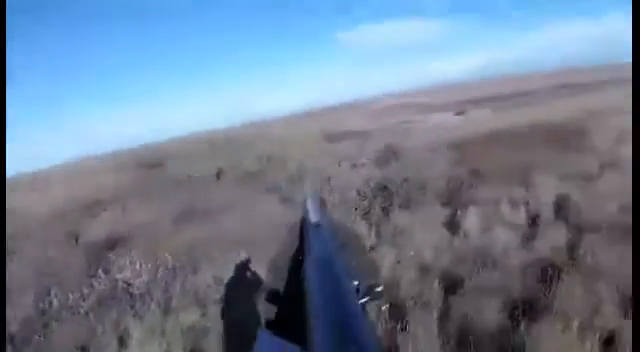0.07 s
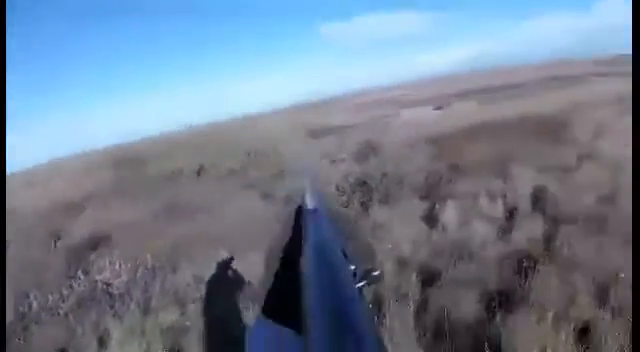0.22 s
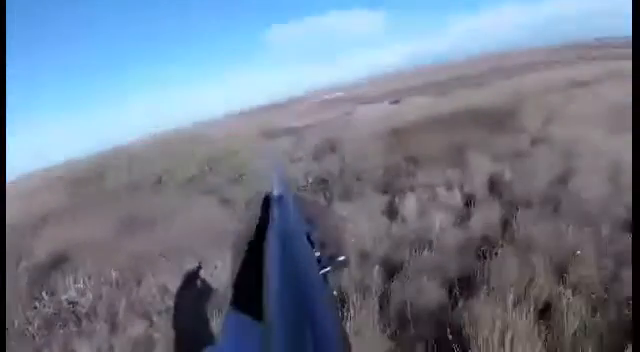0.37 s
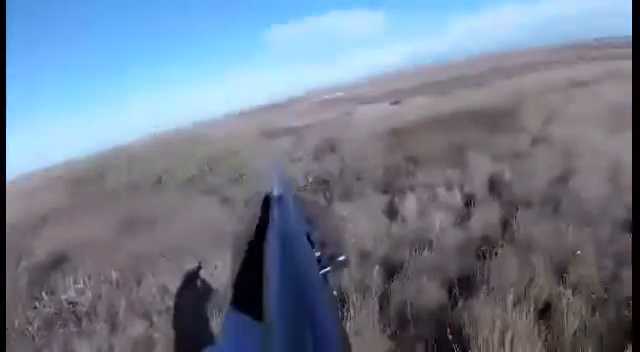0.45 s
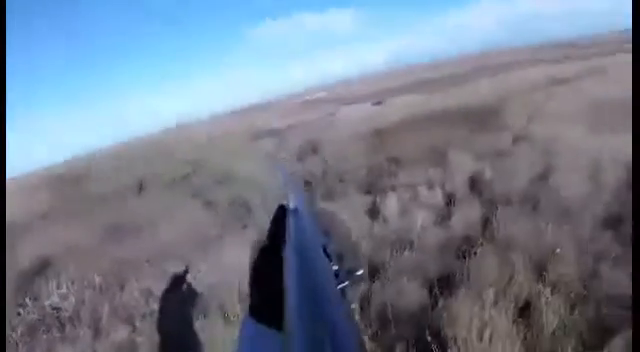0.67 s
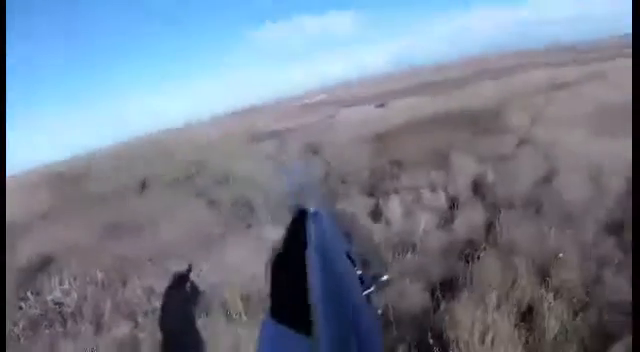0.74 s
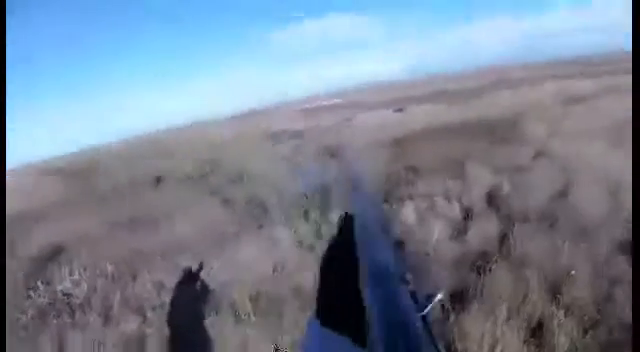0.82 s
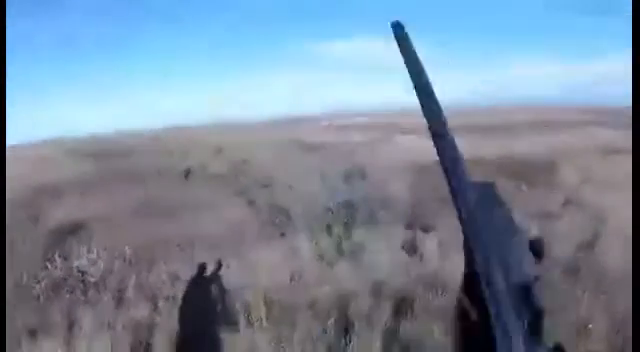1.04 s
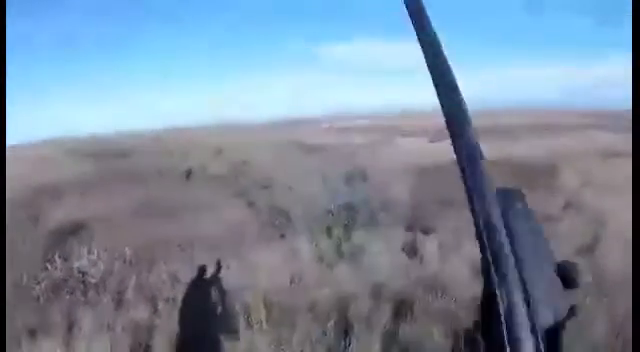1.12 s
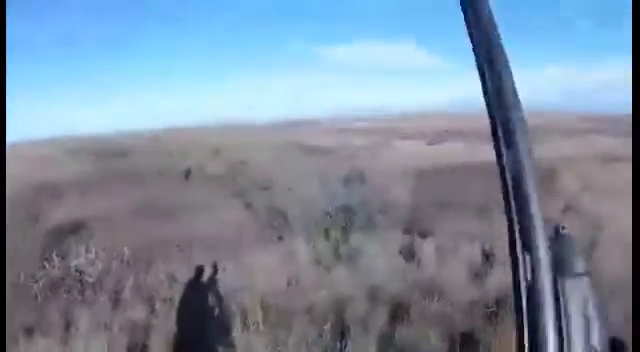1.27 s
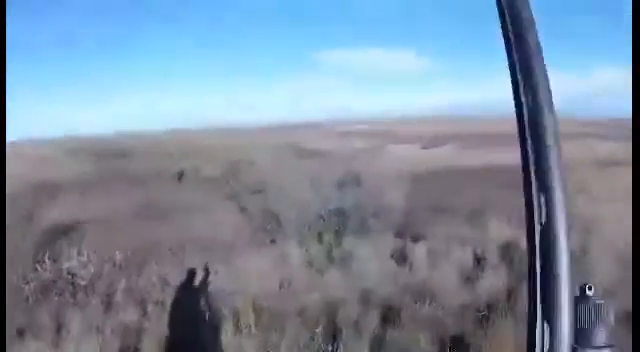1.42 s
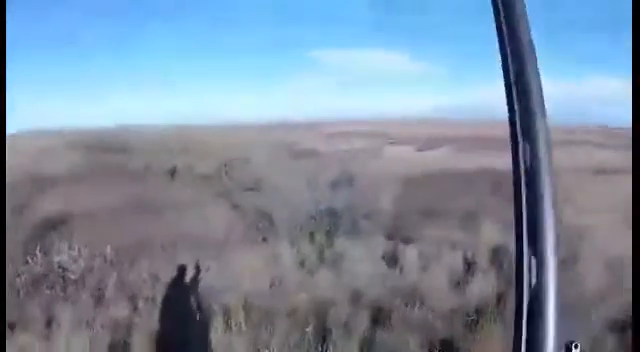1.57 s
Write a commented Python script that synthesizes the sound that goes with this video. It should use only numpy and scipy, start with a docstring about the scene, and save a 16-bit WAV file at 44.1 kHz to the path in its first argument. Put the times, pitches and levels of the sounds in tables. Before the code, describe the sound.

One sharp shotgun shot with a faint echo, as light wind rumbles on the microphone.

```python
"""Open grassland: one shotgun shot, heard from a small camera worn by the shooter.
Wind buffets the microphone and rustles the grass; the background cuts out just before the shot.
The action snaps, shock fronts and a burst of gas overload the microphone, and the grass scatters the bang.
The pellets hiss away, falling in pitch as drag slows them, and distant slopes return a faint echo.
The gun clicks as it is raised."""
import sys
import numpy as np
from scipy import signal
from scipy.fft import rfft, irfft
from scipy.io import wavfile

SR = 44100
rng = np.random.default_rng(int(sys.argv[2]) if len(sys.argv) > 2 else 0)


def wav_record(signal):
    """Record a signal, one row per channel, as 16-bit PCM in the file named by sys.argv[1]."""
    frames = np.transpose(np.atleast_2d(signal))
    bounded = np.clip(frames, -1, 1)
    # unit amplitude maps onto the largest positive 16-bit level
    quanta = np.round(bounded * 32767).astype(np.int16)
    wavfile.write(sys.argv[1], SR, quanta)


N = 70560
TIME_S = np.arange(N) / SR
FREQ_HZ = np.fft.rfftfreq(N, 1 / SR)
SHOT_S = .5866
BLAST_RISE_S, SCATTER_RISE_S, CLICK_RISE_S = .00055, .006, .0011
BANDWIDTH_HZ = 8100


def amp(db):
    """Decibels to gain."""
    return 10 ** (np.asarray(db) / 20)


def unit_rms(x):
    """Scales to rms 1."""
    return x / np.sqrt(np.mean(x ** 2) + 1e-20)


def at_hz(table, hz):
    """Interpolates a table over log frequency."""
    table_hz, values = np.transpose(table)
    return np.interp(np.log(hz + 1), np.log(table_hz + 1), values)


def envelope(table):
    """Gain over time from a level table."""
    return amp(np.interp(TIME_S, *np.transpose(table)))


def burst(start_s, rise_s, t60_s, hold_s=0):
    """Envelope: linear rise, exponential decay from hold_s after the start."""
    age_s = TIME_S - start_s
    return np.clip(age_s / rise_s, 0, 1) * amp(-60 * np.maximum(age_s - hold_s, 0) / t60_s)


def noise(bin_gain):
    """Spectrally weighted noise, rms 1."""
    return unit_rms(irfft(rfft(rng.standard_normal(N)) * bin_gain, N))


def coloured_noise(spectrum):
    """Band-limited noise with a tabled spectrum, rms 1."""
    return noise(amp(at_hz(spectrum, FREQ_HZ)) * (FREQ_HZ < BANDWIDTH_HZ))


def band_noise(centre_hz, width_oct):
    """Noise in a bell-shaped band, rms 1."""
    return noise(np.exp(-.5 * (np.log2((FREQ_HZ + 1) / centre_hz) / width_oct) ** 2))


def causal_filter(x, response):
    """Minimum-phase filter: no pre-ringing."""
    log_gain = np.log(amp(at_hz(response, abs(np.fft.fftfreq(N, 1 / SR)))))
    transfer = np.exp(np.conj(signal.hilbert(log_gain)))
    return irfft(rfft(x) * transfer[:len(FREQ_HZ)], N)


def lowpass(x, cutoff_hz):
    """Steep band limit."""
    return signal.oaconvolve(x, signal.firwin(601, cutoff_hz, window=("kaiser", 7), fs=SR), "same")


# gusts (time [s], level [dB])
BUFFET_LEVELS = [(0, -46.5), (.06, -38.5), (.12, -41), (.21, -37), (.33, -40.5), (.38, -32), (.47, -44),
                 (.52, -39.5), (.7, -56.5), (.82, -59.5), (.88, -49), (.93, -56), (1.05, -56), (1.19, -49),
                 (1.26, -56.5), (1.36, -53), (1.42, -49.5), (1.47, -52), (1.53, -40), (1.57, -40),
                 (1.6, -55)]
# rumble (frequency [Hz], density [dB])
BUFFET_SPECTRUM = [(10, -22.5), (22, -0.5), (45, 0), (70, 0), (100, -10), (140, -17.5), (200, -28.5),
                   (400, -53.5), (1000, -78.5)]


def wind_buffet():
    """Gusts rumble on the microphone."""
    return envelope(BUFFET_LEVELS) * coloured_noise(BUFFET_SPECTRUM)


def stalk_ticks(rate_per_s=21):
    """Dry stalks tick against each other at random; rms 1."""
    touches = rng.uniform(.5, 1, N) * (rng.random(N) < rate_per_s / SR)
    decays = signal.fftconvolve(touches, burst(0, CLICK_RISE_S, t60_s=.03))[:N]
    return unit_rms(decays * band_noise(centre_hz=4500, width_oct=.12))


# wind in the grass (time [s], level [dB])
RUSTLE_LEVELS = [(0, -56.5), (.13, -54), (.22, -57), (.38, -56), (.5, -60), (.7, -64.5), (.92, -72),
                 (1.15, -67.5), (1.25, -70.5), (1.6, -67)]
# rustle (frequency [Hz], density [dB])
RUSTLE_SPECTRUM = [(60, -5), (200, 0), (450, 1.5), (900, -3), (1100, -4), (1220, 1), (1340, -5), (2000, -9),
                   (3000, -12.5), (4000, -24.5), (6500, -32.5)]


def grass_rustle(ticks_relative_db=-18.5):
    """Wind stirs the grass; rustle and ticks swell together."""
    rustle = coloured_noise(RUSTLE_SPECTRUM)
    return envelope(RUSTLE_LEVELS) * (rustle + amp(ticks_relative_db) * stalk_ticks())


# treble hiss (time [s], level [dB])
HISS_LEVELS = [(0, -65.5), (.5, -62.5), (.75, -78), (.95, -78.5), (1.15, -71), (1.6, -76)]
# treble hiss (frequency [Hz], density [dB])
HISS_SPECTRUM = [(1000, -20.5), (3500, -11.5), (5800, -11.5), (6300, -4.5), (6650, 0.5), (6900, -7.5),
                 (7150, -48.5)]


def wind_hiss():
    """A thin hiss rides on the wind."""
    return envelope(HISS_LEVELS) * coloured_noise(HISS_SPECTRUM)


def background_duck(background, start_s=.5294, end_s=.59, recovery_s=.031, duck_db=-26,
                    pop_db=-32.5, pop_tau_s=.005):
    """The background cuts out with a soft pop just before the shot, then returns."""
    started = TIME_S > start_s
    depth = started * np.clip(1 - (TIME_S - end_s) / recovery_s, 0, 1)
    pop = -amp(pop_db) * started * np.exp(-abs(TIME_S - start_s) / pop_tau_s)
    return background * amp(duck_db * depth) + pop


# action and handling (time [s], level [dB], centre [Hz], width [oct], t60 [s])
GUN_CLICKS = [(0.5807, -30, 1680, .55, 0.042), (.841, -57, 1760, 0.72, 0.053),
              (1.35, -55, 1780, 0.59, 0.035), (1.359, -62, 2830, .6, 0.058),
              (1.386, -57, 1890, 0.82, 0.015)]


def gun_clicks():
    """Short, damped rattles of the gun's parts."""
    return sum(amp(db) * burst(start_s, CLICK_RISE_S, t60_s) * band_noise(centre_hz, width_oct)
               for start_s, db, centre_hz, width_oct, t60_s in GUN_CLICKS)


# muzzle gas (frequency [Hz], density [dB])
GAS_SPECTRUM = [(60, -16), (300, -5.5), (1500, -1.5), (2200, -1), (3100, 0), (4000, -16), (4900, -4.5),
                (5800, -5.5), (6600, -14.5), (7600, -41)]


def gas_roar(level_db=-23):
    """Gas bursts from the muzzle in a short roar."""
    decay = burst(SHOT_S, BLAST_RISE_S, t60_s=.025, hold_s=.0065)
    return amp(level_db) * coloured_noise(GAS_SPECTRUM) * decay


# tones in the bang (frequency [Hz], level [dB], t60 [s])
BLAST_RINGS = [(420, -25.5, 0.07), (1081, -25, 0.051), (1546, -24, 0.042), (2200, -21.5, 0.037),
               (2810, -24, 0.02), (3098, -28, .025), (5660, -33.5, 0.018)]


def blast_ring():
    """Brief ringing tones colour the bang."""
    return sum(amp(db) * np.sin(2 * np.pi * hz * (TIME_S - SHOT_S)) * burst(SHOT_S, BLAST_RISE_S, t60_s)
               for hz, db, t60_s in BLAST_RINGS)


# muzzle shock and nearest reflections (time [s], pre-filter level [dB], push length [ms])
SHOCK_FRONTS = [(.58691, -7, .52), (.58872, -6.5, .13), (.58939, -8.7, .39), (.59116, 2, .37),
                (.59199, -8, .52), (.5924, -3, .41), (.59388, -6.5, .87)]
# blast colour (frequency [Hz], gain [dB])
SHOCK_RESPONSE = [(40, -9), (150, 6), (400, 2.5), (900, -2), (1500, 7), (1900, -5), (3000, 6), (4000, -6.5),
                  (4900, 3), (5800, -0.5), (6600, -11.5), (7600, -40)]


def shock_fronts():
    """Each front is a sudden push of pressure, then suction."""
    pressure = np.zeros(N)
    for start_s, db, push_ms in SHOCK_FRONTS:
        onset = np.clip((TIME_S - start_s) * SR, 0, 1)
        age_in_pushes = np.maximum(TIME_S - start_s, 0) * 1000 / push_ms
        pressure += amp(db) * onset * (1 - age_in_pushes) * np.exp(-age_in_pushes)
    return causal_filter(pressure, SHOCK_RESPONSE)


def air_thump(start_s=.5917, pitch_hz=81.7, gain_db=-7):
    """One low heave of air, suction first."""
    wave = -np.sin(2 * np.pi * pitch_hz * (TIME_S - start_s))
    return amp(gain_db) * wave * burst(start_s, rise_s=.0078, t60_s=.052)


# near scatter (frequency [Hz], density [dB])
GRASS_SPECTRUM = [(60, 2), (180, 1.5), (300, -2), (500, 1), (1060, 2), (1700, -12.5), (2400, -11),
                  (3800, -20), (5200, -13), (6000, -20.5), (6800, -34)]
# scatter decay (frequency [Hz], t60 [s])
GRASS_DECAY = [(60, 0.25), (400, 0.2), (1200, .2), (3000, 0.31), (6000, 0.37)]


def grass_scatter(gain_db=-29):
    """Near grass scatters the bang; each band decays at its own rate."""
    hz, frame_s, bands = signal.stft(coloured_noise(GRASS_SPECTRUM), SR, nperseg=256)
    decay = amp(-60 * np.maximum(frame_s - SHOT_S, 0) / at_hz(GRASS_DECAY, hz)[:, None])
    tail = signal.istft(bands * decay, SR, nperseg=256)[1][:N]
    onset = np.clip((TIME_S - SHOT_S) / SCATTER_RISE_S, 0, 1)
    return amp(gain_db) * onset * tail


# far scatter (frequency [Hz], density [dB])
GROUND_SPECTRUM = [(100, 2), (400, -0.5), (900, -4.5), (1500, 3.5), (2000, -4.5), (3000, -0.5),
                   (4000, -7.5), (5500, -3), (6800, -18)]


def ground_scatter(gain_db=-51):
    """Far ground scatters the bang for longer."""
    return amp(gain_db) * coloured_noise(GROUND_SPECTRUM) * burst(SHOT_S, SCATTER_RISE_S, t60_s=.98)


def pellet_hiss(start_hz=11500, drag_per_s=4.45, width_hz=650, peak_db=-67.5, peak_s=.81, spread_s=.085):
    """The pellets hiss at a pitch that follows their speed, which drag wears down."""
    pitch_hz = start_hz / (1 + drag_per_s * np.maximum(TIME_S - SHOT_S, 0))
    carrier = np.cos(2 * np.pi * np.cumsum(pitch_hz) / SR)
    flutter = noise(1 / (1 + (2 * FREQ_HZ / width_hz) ** 2))
    swell = np.exp(-.5 * ((TIME_S - peak_s) / spread_s) ** 2) * (TIME_S > SHOT_S)
    return amp(peak_db) * swell * unit_rms(flutter * carrier)


# echo arrivals (time [s], level [dB], half length [s])
ECHO_SWELLS = [(1.01, -62.5, .022), (1.069, -62.5, 0.017), (1.111, -69.5, 0.023), (1.298, -69, 0.02)]
# echo (frequency [Hz], density [dB])
ECHO_SPECTRUM = [(150, -12.5), (450, -3.5), (700, -7.5), (1050, -2.5), (1130, -7), (1185, 8), (1250, -8.5),
                 (1700, -17), (2500, -26), (6000, -27)]


def slope_echo():
    """Distant slopes return the bang in faint swells."""
    swells = sum(amp(db) * np.exp(-.5 * ((TIME_S - peak_s) / half_s) ** 2)
                 for peak_s, db, half_s in ECHO_SWELLS)
    return swells * coloured_noise(ECHO_SPECTRUM)


def scene():
    """The blast over its duller aftermath, the clicks and the wind."""
    blast = gas_roar() + blast_ring() + shock_fronts() + air_thump()
    aftermath = grass_scatter() + ground_scatter() + slope_echo() + pellet_hiss()
    clicks = gun_clicks()
    background = background_duck(wind_buffet() + grass_rustle() + wind_hiss())
    return (blast + lowpass(aftermath + clicks + background, cutoff_hz=6950))[None]


def record(dry):
    """Microphone overload rounds off the peaks; a band limit follows."""
    ceiling = 1.5
    saturated = ceiling * np.tanh(dry[0] / ceiling)
    return lowpass(saturated, BANDWIDTH_HZ)[None]


dry = scene()
out = record(dry)
wav_record(out)
```